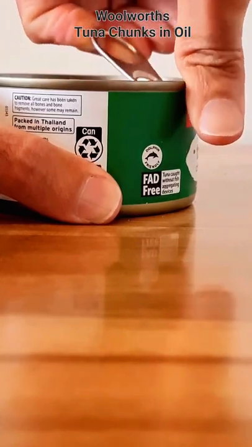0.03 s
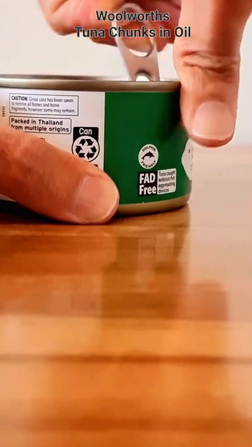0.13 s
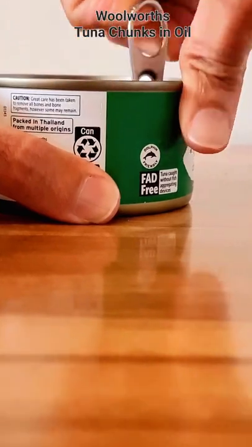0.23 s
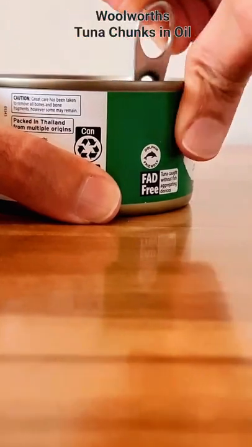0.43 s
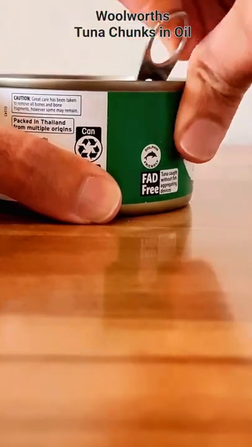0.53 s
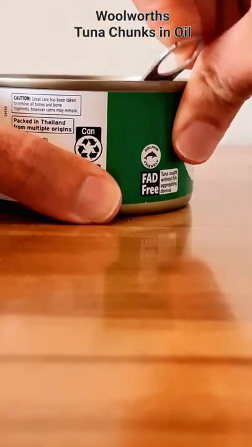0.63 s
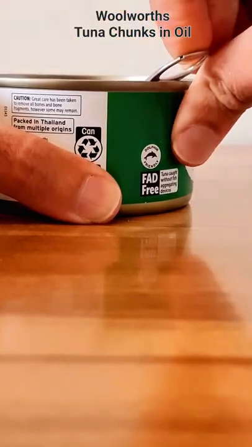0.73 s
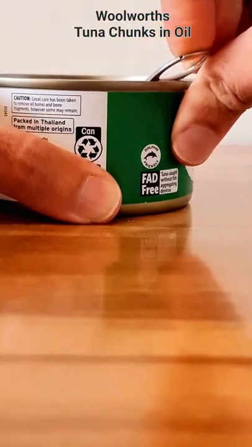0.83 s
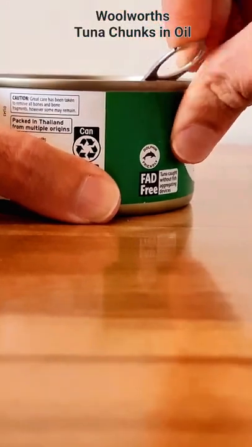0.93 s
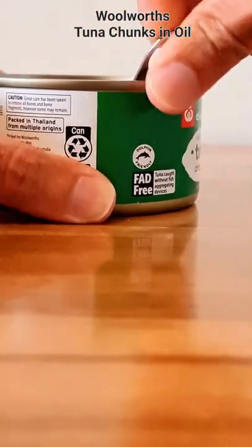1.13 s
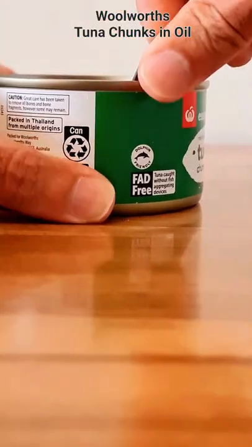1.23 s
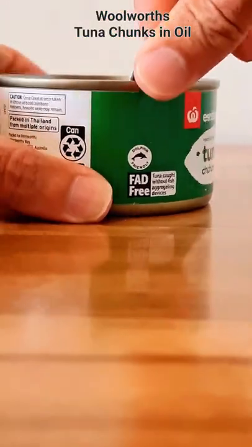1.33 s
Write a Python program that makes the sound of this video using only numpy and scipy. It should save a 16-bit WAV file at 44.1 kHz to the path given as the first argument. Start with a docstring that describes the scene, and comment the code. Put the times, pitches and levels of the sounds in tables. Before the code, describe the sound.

A can's metal ring pull scrapes, cracks the lid with a sharp snap, then clicks.

```python
"""A ring pull is levered up on a small steel can held on a wooden table, close by in a small room.
Over a faint hum the tab scrapes by stick-slip friction, and the strained lid flexes and creaks.
At a quarter of a second the score line fractures: the can rings in its modes and thumps the table.
The tab then knocks on the lid, ticks on the torn edge, strikes the rim and skids along it.
Last, a fingertip brushes over the tab and a soft tap sounds on the table."""
import sys
import numpy as np
from scipy import signal
from scipy.fft import rfft, irfft, next_fast_len
from scipy.io import wavfile
from scipy.ndimage import map_coordinates

SR = 44100
rng = np.random.default_rng(int(sys.argv[2]) if len(sys.argv) > 2 else 0)


def transcribe(signal):
    """Save signal, clipped to [-1, 1], as a 16-bit WAV file at the path in sys.argv[1]."""
    frames = np.atleast_2d(signal).T
    limited = np.clip(frames, -1, 1)
    pcm = np.round(limited * 32767).astype(np.int16)
    wavfile.write(sys.argv[1], SR, pcm)


N = 61739
T = np.arange(N) / SR
SHIMMER_DB, SHIMMER_RATE_HZ = 2.5, 110  # random level flutter of the metal's tones


def amp(db):
    """Amplitude ratio of a level in decibels."""
    return 10 ** (np.asarray(db) / 20)


def unit_rms(x):
    """Normalisation to an rms of 1."""
    return x / np.sqrt(np.mean(x ** 2) + 1e-20)


def curve_at(points, hz):
    """Interpolation of (frequency_hz, value) points on a logarithmic frequency axis."""
    frequencies, values = np.transpose(points)
    return np.interp(np.log(hz + 1), np.log(frequencies + 1), values)


def envelope(points):
    """Amplitude envelope through (time_s, level_db) points, silent outside them."""
    times, levels = np.transpose(points)
    return np.where((T >= times[0]) & (T <= times[-1]), amp(np.interp(T, times, levels)), 0)


def strike(start_s, t60_s, rise_s=0.00013, hold_s=0):
    """Exponential rise, then exponential decay once the hold is over."""
    age = np.maximum(T - start_s, 0)
    return (1 - np.exp(-age / rise_s)) * amp(-60 * np.maximum(age - hold_s, 0) / t60_s)


def pan(db):
    """Channel gains for a level difference, left minus right."""
    return amp(np.array([[.5], [-.5]]) * db)


def wobble(rate_hz):
    """Smooth random modulation: a spline through Gaussian values."""
    return map_coordinates(rng.standard_normal(8192), [T * rate_hz], mode="wrap")


def slips(per_s):
    """Stick-slip friction as two trains of random impulses."""
    return (rng.random(N) < per_s / SR) * rng.standard_normal((2, N))


def resonance(f, hz, width_hz):
    """Complex band-pass response of a damped oscillator."""
    return 1j * f * width_hz / (hz * hz - f * f + 1j * f * width_hz)


def filtered(x, response):
    """Linear filtering: the spectrum times a frequency response."""
    size = next_fast_len(N + SR // 2)
    return irfft(rfft(x, size) * response(np.fft.rfftfreq(size, 1 / SR)), size)[..., :N]


# Likeness of left and right: frequency_hz, correlation
COHERENCE = [(60, 0.36), (250, 0.31), (600, -0.58), (2000, -0.34), (5000, -0.27), (10000, 0.52)]
def stereo_angle(hz):
    """Phase angle whose cosine is the correlation between the channels."""
    return np.arccos(np.clip(curve_at(COHERENCE, hz), -1, 1))


def spread(pair, response):
    """Partial coherence: two independent signals, filtered and mixed as mid and side at rms 1."""
    def shares(f):
        angle = stereo_angle(f) / 2
        return np.array([np.cos(angle), np.sin(angle)])
    mid, side = filtered(pair, lambda f: response(f) * shares(f))
    return unit_rms(np.array([mid + side, mid - side]))


def noise(spectrum):
    """Stereo Gaussian noise shaped by a spectral envelope."""
    return spread(rng.standard_normal((2, N)), lambda f: amp(curve_at(spectrum, f)))


def ring(modes, start_s, rise_s=.0006, drift_rad=0.16, shimmer_db=SHIMMER_DB):
    """Modal superposition: damped, slightly unsteady sinusoids, out of phase between the channels."""
    out = np.zeros((2, N))
    for hz, db, t60_s in modes:
        offset = stereo_angle(hz) * np.array([[-.5], [.5]])
        gain = amp(db + shimmer_db * wobble(SHIMMER_RATE_HZ)) * strike(start_s, t60_s, rise_s)
        out += gain * np.sin(2 * np.pi * hz * (T - start_s) + offset + drift_rad * wobble(60))
    return out


# Room air: frequency_hz, level_db
AIR_SPECTRUM = [(20, -2.5), (60, 6), (130, -12), (250, -17.5), (450, -16), (1400, -17), (2200, -25.5),
                (7000, -30), (8000, -43.5), (10000, -36.5), (16000, -39.5)]
def background():
    """Ambient noise: broadband air, and a narrow low band heard as a wavering hum."""
    hum = spread(rng.standard_normal((2, N)), lambda f: resonance(f, hz=77.4, width_hz=7) ** 2)
    return amp(-63.5) * noise(AIR_SPECTRUM) + amp(-61.5) * hum


# Course of the scrape: time_s, level_db
SCRAPE_LEVELS = [(0, -53), (.018, -49), (.032, -55.5), (.076, -38.5), (.104, -40.5), (.132, -46),
                 (.146, -37.5), (.162, -44), (.173, -38.5), (.2, -51), (.235, -52), (.25, -93)]
# Friction hiss: frequency_hz, level_db
SCRAPE_SPECTRUM = [(200, -25.5), (500, -28.5), (1200, -18.5), (1900, -18), (3400, -4), (5700, -5.5),
                   (6900, -2), (7700, -8.5), (10000, -9.5), (14000, -13.5), (16000, -20.5)]
# Resonances of the tab: pitch_hz, width_hz, level_db
TAB_RESONANCES = [(3450, 200, -9.5), (4150, 160, -4), (4706, 180, -6.5), (5400, 201.4, -6),
                  (6176, 550, -6.5), (6670, 200, -2.5), (6975, 140, 1), (7070, 200, -7), (8100, 77, -7.5),
                  (9780, 251, -8.5), (11400, 340, -14), (13600, 520, -14)]
def scrape():
    """Stick-slip friction of metal on metal hisses in spurts and excites the tab's resonances."""
    def tab(f):
        return sum(amp(db) * abs(resonance(f, hz, width)) ** 2 for hz, width, db in TAB_RESONANCES)
    hiss = spread(slips(per_s=8200), lambda f: amp(curve_at(SCRAPE_SPECTRUM, f)))
    singing = spread(slips(per_s=8200), tab)
    return pan(3.5) * envelope(SCRAPE_LEVELS) * unit_rms(hiss + amp(4) * singing)


# Course of the bending: time_s, level_db
FLEX_LEVELS = [(.1, -83), (.2, -68), (.4, -96.5), (.445, -69), (.48, -73), (.52, -68.5), (.55, -75),
               (.59, -58.5), (.64, -62), (.69, -74), (.75, -59), (.8, -59.5), (.87, -50), (.93, -114),
               (1.02, -68), (1.17, -72), (1.24, -63), (1.35, -67)]
# Resonances of the bending lid: pitch_hz, width_hz, level_db
FLEX_RESONANCES = [(456.1, 28, 2.5), (859, 23, -0.5), (1050, 27, 1), (1480, 530, -13.5)]
def flex():
    """Forced vibration: the tab rubs and bends the lid, driving its low resonances."""
    def lid(f):
        peaks = sum((-1) ** k * amp(db) * resonance(f, hz, width)
                    for k, (hz, width, db) in enumerate(FLEX_RESONANCES))
        return peaks / (1 + (f / 1800) ** 8)  # low-pass at 1800 Hz
    return envelope(FLEX_LEVELS) * spread(slips(per_s=1500), lid)


# Creaks of the lid: start_s, length_s, start_hz, end_hz, level_db, roughness_rad
CREAK_GLIDES = [(0.124, 0.14, 812, 562, -62.5, 1.34), (0.273, 0.12, 412, 389, -49.5, 0.21),
                (0.487, 0.048, 319.4, 309, -60.5, 0.88), (0.723, 0.049, 1049, 1060, -59, 0.61),
                (1.044, 0.2, 663, 825, -65.5, 1.6), (1.11, 0.14, 341.4, 360, -71.5, 0.77)]
def creaks():
    """Strained sheet metal gives gliding tones, roughened by random phase modulation."""
    out = np.zeros((2, N))
    for start_s, length_s, start_hz, end_hz, db, roughness_rad in CREAK_GLIDES:
        progress = np.clip((T - start_s) / length_s, 0, 1)
        phase = 2 * np.pi * np.cumsum(start_hz + (end_hz - start_hz) * progress) / SR
        arch = np.sqrt(abs(np.sin(np.pi * progress)))
        gain = amp(db + SHIMMER_DB * wobble(SHIMMER_RATE_HZ)) * arch
        jitter = roughness_rad * np.array([wobble(170), wobble(170)])
        out += gain * np.sin(phase + jitter)
    return out


# Tearing score line: frequency_hz, level_db
CRACK_SPECTRUM = [(100, -17.5), (300, -8.5), (600, -4.5), (1400, -7), (2400, -18.5), (2870, -13.5),
                  (3400, -10), (4200, -11), (4900, 0), (5700, -6), (6900, -8.5), (8700, -14.5),
                  (11000, -26), (13000, -18.5), (16000, -33)]
# The can's many overlapping modes, heard as a wash: frequency_hz, level_db
WASH_SPECTRUM = [(88, -36), (150, -10.5), (259, -4.5), (361, -5.5), (398, -5), (494, -11.5), (1690, -19.5),
                 (3160, -28.5), (5460, -24.5), (5790, -13), (6390, -27.5), (6910, -9.5), (7770, -32),
                 (11700, -29.5), (16000, -41)]
# Distinct modes of the can: pitch_hz, level_db, t60_s
CAN_MODES = [(228.7, -4, 0.16), (286, -11.5, 0.33), (348.7, -8.5, .22), (502.7, -10.5, .1), (636, -9, .1),
             (829, -3.5, .15), (1225, -6.5, 0.27), (1288, 7, 0.073), (1511, -4, .12), (1640, 0.5, .17),
             (2869, -6.5, 0.18), (3646, -5, .15), (4823, -6.5, .24), (5330, -5, .11), (5905, -8.5, 0.46),
             (7010, -3, 0.31), (8504, -22, 0.26), (12430, -12, .06)]
def snap(start_s=.2448):
    """Fracture: the score line creeps, then tears in milliseconds and sets the can in free vibration."""
    creep = envelope([(start_s - 0.015, -33), (start_s, -15.5)])
    tear = strike(start_s, t60_s=0.014, hold_s=0.0045)
    crack = amp(-19.5) * noise(CRACK_SPECTRUM) * (creep + tear)
    wash = amp(-25.5) * noise(WASH_SPECTRUM) * strike(start_s, t60_s=0.25, rise_s=0.0028)
    low = [(hz, db, t60_s) for hz, db, t60_s in CAN_MODES if hz < 2000]
    # The can is not quite round, so each high mode splits into a beating cluster.
    high = [(hz + split_hz, db - 6, t60_s) for hz, db, t60_s in CAN_MODES[len(low):]
            for split_hz in 22 * rng.standard_normal(4)]
    ringing = ring(low, start_s, drift_rad=0.22) + ring(high, start_s, drift_rad=0.64)
    return pan(2.5) * crack + wash + amp(-30) * ringing


# Jolts of the can: start_s, level_db
JOLTS = [(0.254, -19.5), (0.499, -57), (.838, -45.5), (1.388, -55)]
# Modes of the table top: pitch_hz, level_db, t60_s
TABLE_MODES = [(58.3, -6.5, 0.41), (79.3, 1, .2), (120.5, 1, 0.1), (165, -9, 0.15)]
def thumps():
    """Structure-borne sound: each jolt of the can booms in the table's low modes."""
    return sum(amp(db) * ring(TABLE_MODES, start_s, rise_s=0.0019, drift_rad=0.45, shimmer_db=0)
               for start_s, db in JOLTS)


# Contacts of tab and lid: start_s, level_db, tilt_db_per_octave, ring_db
CONTACTS = [(.367, -43, 3.5, -17.5), (.529, -55.5, 2.5, -1), (0.8279, -35, -1.5, -7.5),
            (1.0172, -59.5, -4.5, -1)]
# Contact noise before its tilt: frequency_hz, level_db
KNOCK_SPECTRUM = [(60, -24), (130, -21), (250, -10.5), (460, -2.5), (680, -19), (1080, 3.5), (1350, -2.5),
                  (1620, 0), (2100, -24), (3050, -15), (3800, -27), (4700, -15), (5200, -25.5), (6000, -15),
                  (8300, -34.5), (14000, -45.5)]
# Modes of the loosened lid: pitch_hz, level_db, t60_s
LID_MODES = [(111, 2, 0.17), (447.8, -3.5, 0.23), (1042, -0.5, 0.08), (1298, -1.5, 0.076),
             (1370, -2, 0.041), (1534, -5.5, .045), (3100, -28.5, 0.3), (3240, -15, 0.13),
             (4737, -24, 0.14), (6100, -16, 0.1)]
def knocks():
    """Impact excitation: soft contacts ring the loosened lid, damped by the fingers."""
    out = np.zeros((2, N))
    for start_s, db, tilt, ring_db in CONTACTS:
        spectrum = [(hz, level_db + tilt * np.log2(hz)) for hz, level_db in KNOCK_SPECTRUM]
        hit = strike(start_s, t60_s=.03, rise_s=.0007, hold_s=0.0021)
        tail = amp(-26.5) * strike(start_s, t60_s=.2)
        contact = noise(spectrum) * (hit + tail)
        out += amp(db) * (contact + amp(ring_db) * ring(LID_MODES, start_s))
    return out


# The tab catching on the torn edge: start_s, level_db
CATCHES = [(0.4693, -36)]
# Metal click: frequency_hz, level_db
TICK_SPECTRUM = [(300, -37), (1500, -4), (3000, -3), (6500, 5), (8000, -7), (16000, -6.5)]
def tick():
    """A brief contact has a broad spectrum: the tab catches with a bright click and a thin tail."""
    out = np.zeros((2, N))
    for start_s, db in CATCHES:
        click = strike(start_s, t60_s=0.0061, rise_s=.0001)
        tail = amp(-21.5) * strike(start_s, t60_s=.25)
        out += amp(db) * noise(TICK_SPECTRUM) * (click + tail)
    return out


# Course of the skid: time_s, level_db
SKID_LEVELS = [(.83, -66), (.858, -65), (.88, -71), (.92, -83.5), (.97, -90)]
def skid():
    """Sliding friction: the tab runs along the rim with a thin, band-limited hiss."""
    hiss = spread(slips(per_s=8200), lambda f: resonance(f, hz=6230, width_hz=1400) ** 2)
    return envelope(SKID_LEVELS) * hiss


# Fingertip sliding on the tab: frequency_hz, level_db
BRUSH_SPECTRUM = [(88, -42), (150, -13.5), (330, -17.5), (430, 3.5), (560, -10.5), (850, -5.5),
                  (1000, -15.5), (1270, -8.5), (2200, -19), (2900, -15), (3130, -11.5), (3400, -23),
                  (4700, -21.5), (5200, -26), (6100, -21.5), (8500, -43.5), (10000, -67), (15000, -58)]
def brush():
    """Skin friction drives the lid's modes, each with a bandwidth inverse to its decay time."""
    def lid(f):
        return sum(amp(db) * resonance(f, hz, np.log(1000) / np.pi / t60_s)
                   for hz, db, t60_s in LID_MODES)
    friction = spread(slips(per_s=9000), lambda f: amp(curve_at(BRUSH_SPECTRUM, f)))
    ringing = spread(slips(per_s=9000), lid)
    stroke = strike(start_s=1.244, t60_s=.11, rise_s=0.0049, hold_s=.038)
    return amp(-46) * (friction + amp(-10) * ringing) * stroke


# Bump on wood: frequency_hz, level_db
TAP_SPECTRUM = [(60, -1.5), (250, -5), (500, -7), (750, 5), (1100, -9), (1500, -10), (2100, -28),
                (3100, -20), (6000, -27.5), (15000, -41)]
def tap():
    """Damped impact: a soft tap on the table gives a short, dull burst of noise."""
    return amp(-48.5) * noise(TAP_SPECTRUM) * strike(start_s=1.387, t60_s=0.107, rise_s=0.00033)


def room(direct):
    """Reverberation: convolution with the short, diffuse tail of a small room."""
    tail = rng.standard_normal((2, N)) * strike(start_s=0.0021, t60_s=0.28)
    return signal.fftconvolve(direct, tail / np.linalg.norm(tail[0]), axes=1)[:, :N]


def scene():
    """Superposition of the direct sounds, their reverberation and the ambient noise."""
    direct = scrape() + flex() + creaks() + snap() + thumps()
    direct += knocks() + tick() + skid() + brush() + tap()
    return direct + amp(-12) * room(direct) + background()


# Balance of the microphone ports: frequency_hz, left_minus_right_db
PORT_BALANCE = [(35, -12.5), (70, -5.5), (130, -3.5), (250, -8), (600, -2), (2000, -1), (6000, -0.5),
                (12000, 3)]
def record(dry):
    """Microphone response: bass leans right, high treble left, and the band ends at 15850 Hz."""
    return filtered(dry, lambda f: pan(curve_at(PORT_BALANCE, f)) * (f < 15850))


dry = scene()
out = record(dry)
transcribe(out)
```